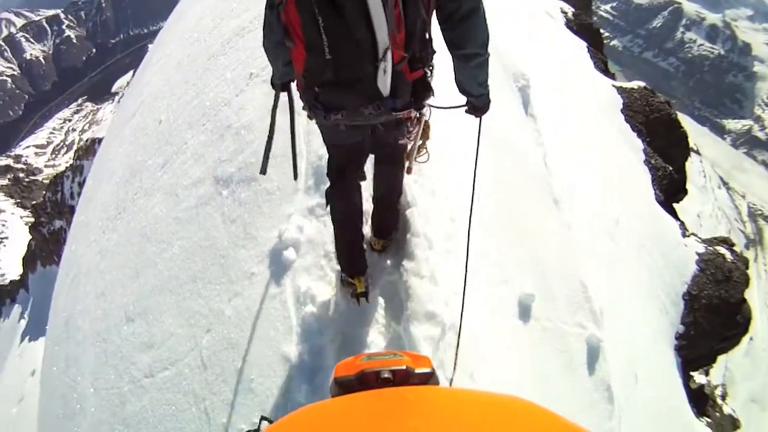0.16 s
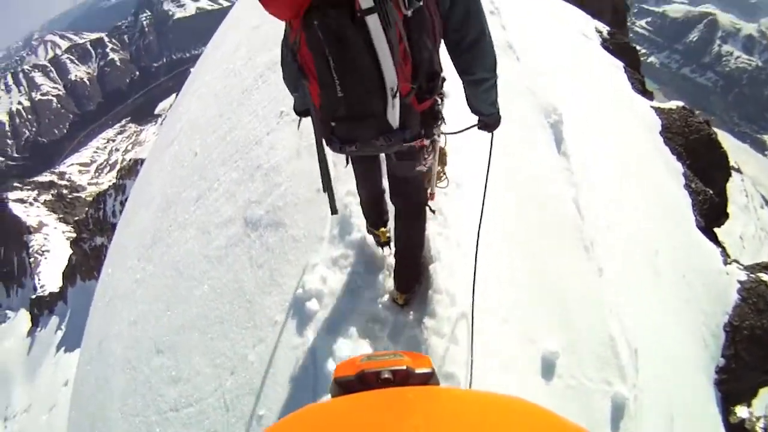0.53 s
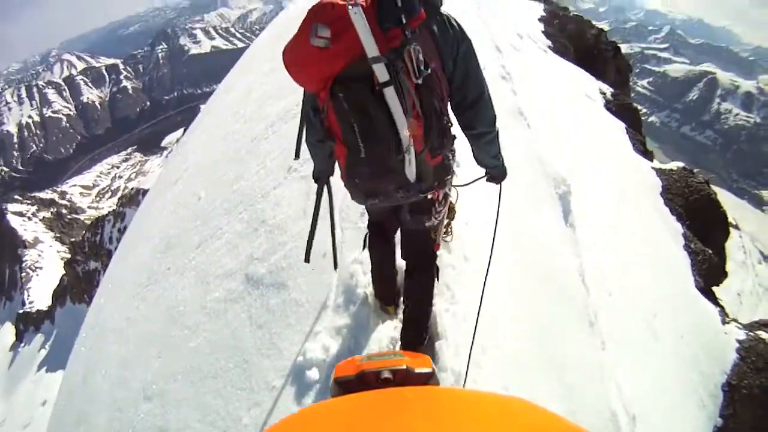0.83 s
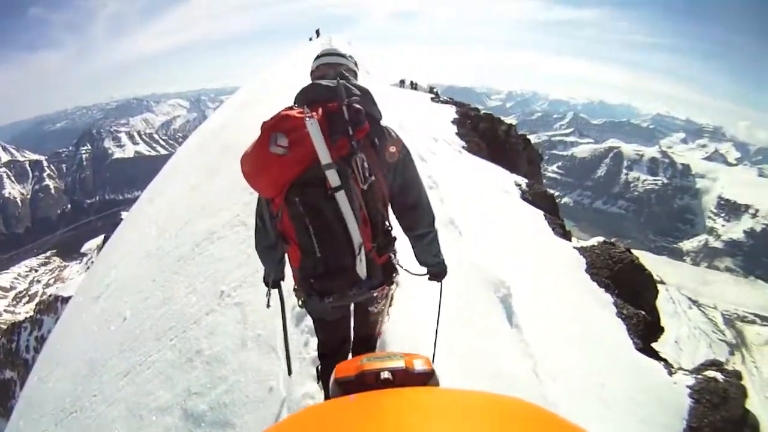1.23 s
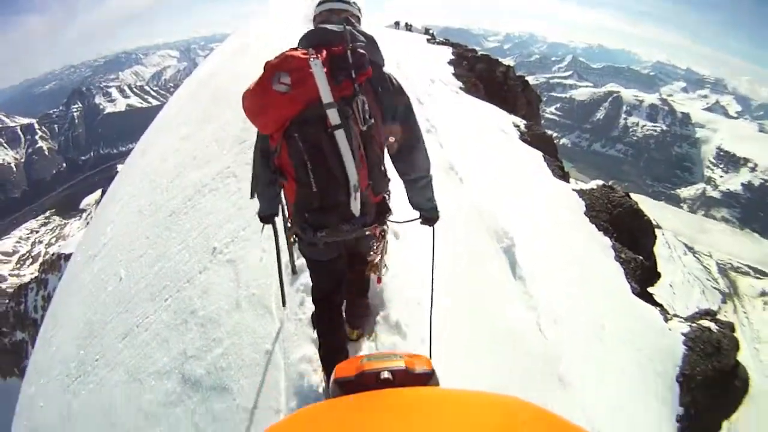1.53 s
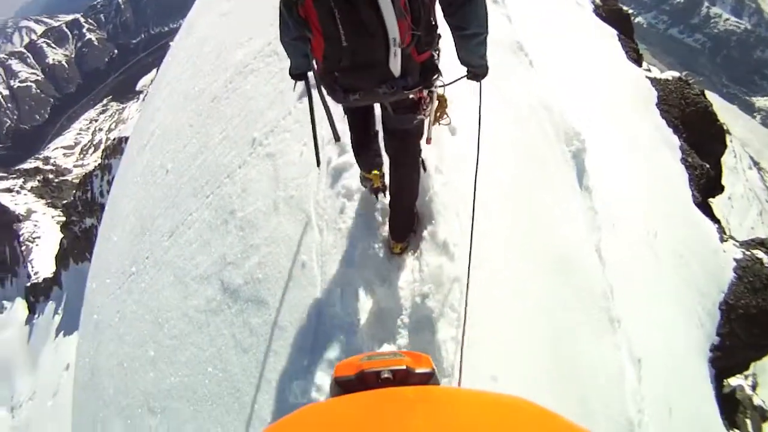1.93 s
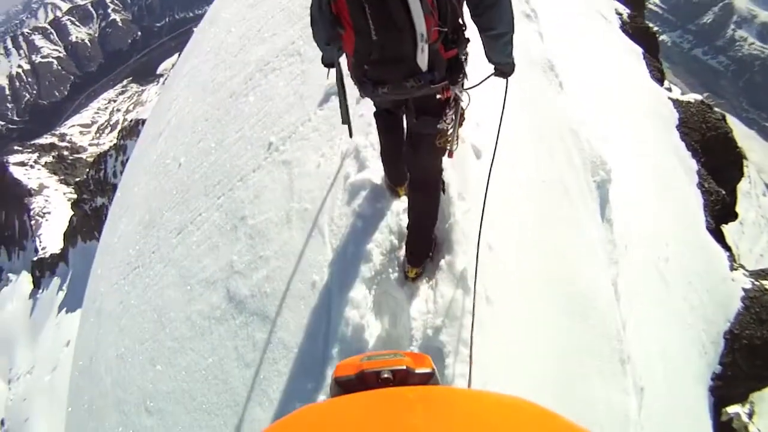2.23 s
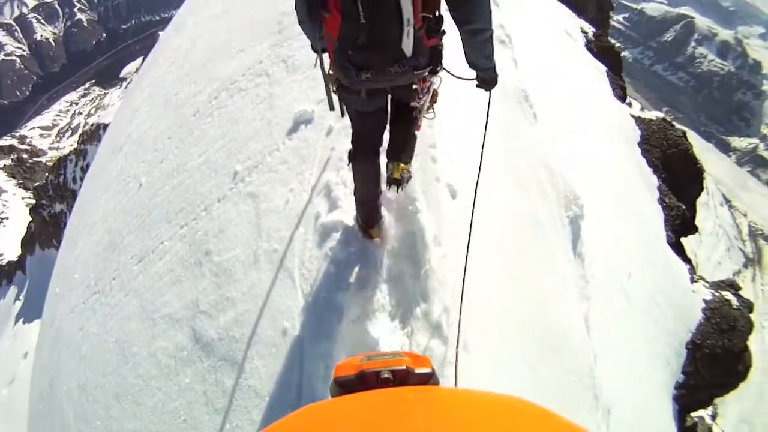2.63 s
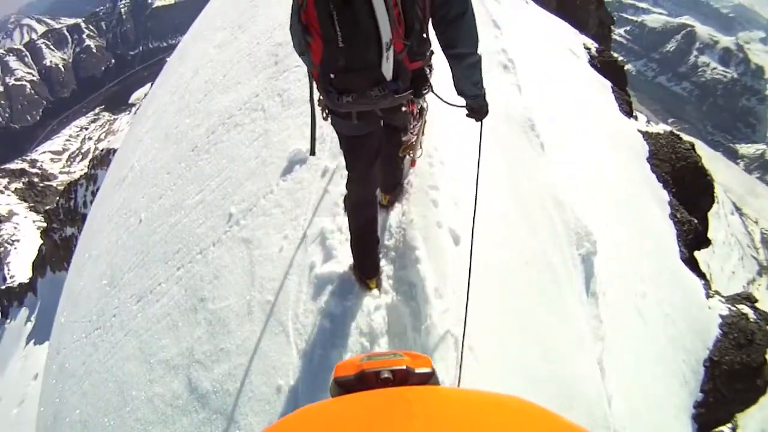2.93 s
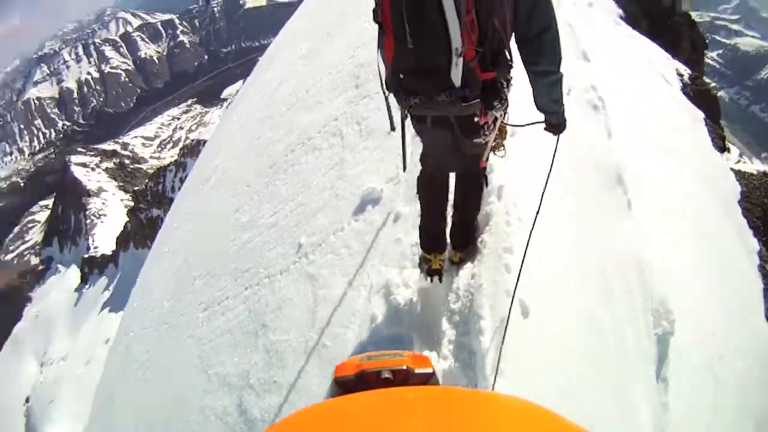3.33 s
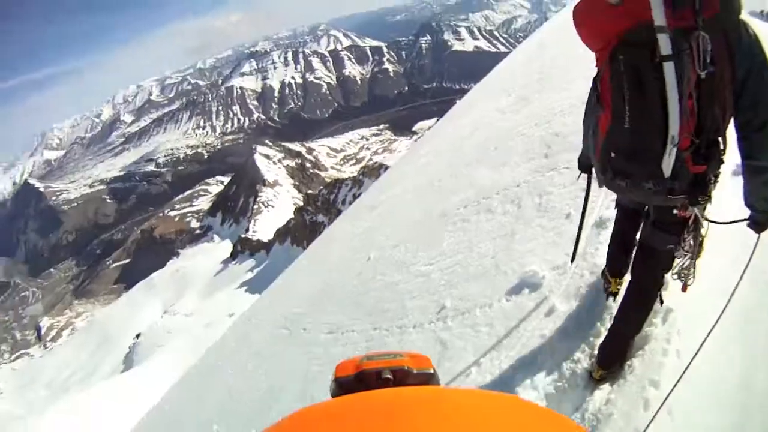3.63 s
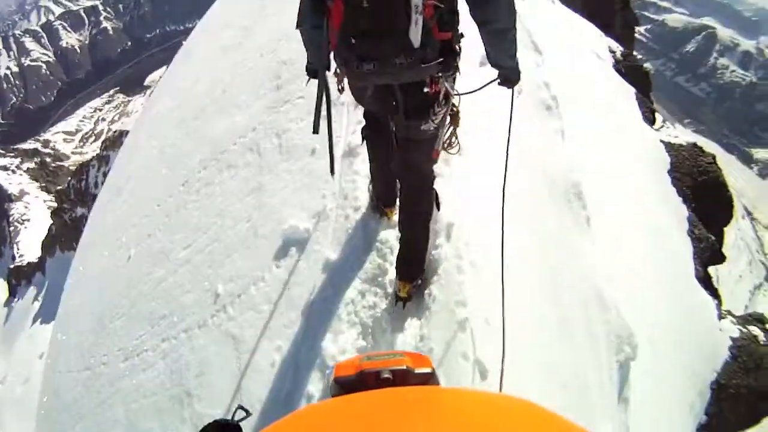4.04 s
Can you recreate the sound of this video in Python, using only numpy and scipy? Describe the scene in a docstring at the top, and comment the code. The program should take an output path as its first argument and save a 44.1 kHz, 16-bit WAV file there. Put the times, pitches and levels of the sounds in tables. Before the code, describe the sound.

Slow footfalls thud deeply through a helmet microphone, with sharp plastic ticks, faint snow crunch and a light wind rumble.

```python
"""A faint scuff and squeak of snow, then the deep shudder of slow footfalls: a climber in crampons on a snow
ridge, heard from a microphone shut in a camera case on the helmet, a body's height above the boots. Each step
shakes the mount, and some make the case tick. Crunching snow, squeaking spikes and brushing trousers come
faintly through the plastic, over light wind and the microphone's own hiss, while a coarse sample-and-hold
mirrors the sound faintly into the treble."""
import sys
import numpy as np
from scipy import signal
from scipy.fft import rfft, irfft
from scipy.io import wavfile

SR = 44100
rng = np.random.default_rng(int(sys.argv[2]) if len(sys.argv) > 2 else 0)


def store_wav(level_fs):
    """Save 16-bit WAV to argv[1]."""
    pcm = np.round(np.clip(np.atleast_2d(level_fs), -1, 1) * 32767)
    wavfile.write(sys.argv[1], SR, pcm.T.astype(np.int16))


N = 183985
TIME = np.arange(N) / SR

# footfalls, carried up to the helmet: t/s at the height, level/dB, f/Hz, rise/s, lopsidedness/0-1,
# rebound delay/s, rebound level/dB, settling delay/s, settling level/dB, packing snow level/dB
FOOTFALLS = [(0.239, -30.5, 34.8, 0.031, .02, 0.054, -36, 0.2, -39.5, -84),
             (0.964, -26, 33, 0.036, 0.07, 0.075, -32, 0.2, -51, -81),
             (1.72, -31, 30.6, 0.038, 0.11, 0.041, -32, 0.13, -38.5, -76),
             (2.35, -21, 31, 0.03, 0.21, .04, -42, 0.11, -39, -65.5),
             (2.946, -17.5, 33.3, 0.031, 0.05, 0.08, -27.5, 0.16, -31.5, -69.5),
             (3.749, -23.5, 32, 0.063, 0.11, 0.049, -27, .124, -51, -74.5)]
# ticks of the case and bright clinks of metal against it, right at the microphone: t/s, level/dB,
# brightness/(dB per octave)
CASE_TICKS = [(0.9471, -32.5, -3.5), (1.015, -49, 20), (1.1277, -21, -3), (1.3532, -51, -3),
              (2.121, -49, 5), (2.3087, -16.5, -0.5), (2.356, -42.5, -8), (2.926, -42, 19.5),
              (2.941, -39.5, -9), (2.959, -47, 20), (3.7218, -38.5, -12), (3.7225, -38, 20.5)]
# modes of the case: f/Hz, relative level/dB, base t60/s
CASE_MODES = [(693, -23.5, 0.088), (1172, 11.5, 0.019), (1660, 6, 0.024), (1815, -11, 0.043),
              (2225, 11, 0.013), (2700, -9, 0.021), (3507, -4, 0.018), (4670, -46, .014)]
# resonances of snow heard through the shell: f/Hz, width/Hz, relative level/dB
SHELL_BANDS = [(1209, 123, 4), (1797, 248, 2.5), (2170, 190, 0), (2563, 230, -7.5), (3534, 167, -5.5),
               (4570, 3400, -17)]
# a swinging boot scuffs the snow: t/s at the height, level/dB, half length/s
BOOT_SCUFFS = [(0.005, -59.5, 0.011), (0.189, -62.5, 0.0041), (0.892, -65, .018), (1.606, -66, 0.16),
               (2.006, -63.5, .009), (2.362, -55.5, 0.0094), (2.787, -62, 0.03), (3.443, -64.5, 0.041),
               (3.584, -49.5, 0.0092)]
# spikes squeak in packed snow: t/s at the height, level/dB, half length/s, f/Hz, glide/(octaves per s)
SPIKE_SQUEAKS = [(0.01, -68, 0.041, 1126, -0.71), (1.697, -62, 0.015, 1097, -0.76),
                 (3.458, -58.5, 0.0162, 1868, -0.83), (3.818, -67.5, 0.083, 1717, -.1)]
# trouser legs brush past each other: t/s at the height, level/dB, half length/s
TROUSER_SWISHES = [(0.45, -66, 0.031), (1.562, -62, 0.018), (1.683, -59, 0.031), (2.81, -61.5, 0.032),
                   (3.438, -62.5, 0.02)]
# spectrum of nylon sliding on nylon: f/Hz, relative level/dB
NYLON_SPECTRUM = [(100, -53), (700, -9), (1300, -8), (2800, 2.5), (4300, 0), (5600, 3)]
# spectrum of wind on the case: f/Hz, relative level/dB
WIND_SPECTRUM = [(10, -16.5), (22, -1.5), (38, -4), (50, -8), (70, -24), (110, -37.5), (250, -60),
                 (600, -61)]
# spectrum of the microphone's hiss: f/Hz, relative level/dB
HISS_SPECTRUM = [(60, 8), (130, 2.5), (240, 0), (330, -2.5), (600, -5.5), (1000, -8), (2000, -10.5),
                 (3000, -13), (4200, -14.5), (5600, -15)]

CONVERTER_HZ, ALIAS_EDGE_HZ, CUTOFF_HZ = 12000, 5620, 16000
LEAN_BEFORE_S, LEAN_DB, LEAN_HZ, LEAN_S = 0.125, -47.5, 28.7, 0.054   # weight shifts ahead of a step
JOLT_FADE_S, SETTLE_S = 0.035, 0.086
REBOUND_HZ, REBOUND_RISE_S, REBOUND_FADE_S = 39.44, 0.02, 0.031
TICK_EDGE_HZ, EDGE_GROWTH = 5700, 1.74   # top edge of a light contact; its rise with force
SOFT_RING_SCALE, RING_DAMPING = 1.34, 1.9   # a light contact rings longer; force damps it
THUD_CAP_DB, THUD_LOSS = -40, 0.44   # the padding limits the thud; bright, light contacts thud less
BITE_BEFORE_S, BITE_S = 0.06, 0.025   # the spikes enter just before the weight lands
BITE_DB, BITE_FOLLOWS = -50, 0.59   # level under a 0 dB footfall; dB gained per dB of footfall
PACK_AFTER_S, PACK_S, PACK_REST_DB = 0.16, 0.1, -71.5   # packing snow never quite rests


def helmet(rub_db=-26):
    """At each footfall the microphone's mount leans, jolts, swings back and settles, rubbing its pads."""
    swing, effort = np.zeros(N), np.zeros(N)
    for at, db, hz, rise_s, lopsided, rebound_s, rebound_db, settle_s, settle_db, _ in FOOTFALLS:
        phase = 2 * np.pi * hz * (TIME - at)
        lean = shudder(at - LEAN_BEFORE_S, LEAN_DB, LEAN_S, LEAN_S)
        jolt = shudder(at, db, rise_s, JOLT_FADE_S)
        back = shudder(at + rebound_s, rebound_db, REBOUND_RISE_S, REBOUND_FADE_S)
        back += shudder(at + settle_s, settle_db, SETTLE_S, SETTLE_S)
        swing += lean * np.cos(2 * np.pi * LEAN_HZ * (TIME - at + LEAN_BEFORE_S))
        swing += jolt * (np.cos(phase) + lopsided * np.cos(2 * phase))   # an uneven swing adds its octave
        swing += back * np.cos(2 * np.pi * REBOUND_HZ * (TIME - at - rebound_s))
        effort += lean ** 2 + jolt ** 2 + back ** 2
    padding = noise([(30, -29), (60, 1.5), (85, -5), (150, -16.5), (230, -25.5), (400, -31),
                     (1000, -37), (3000, -48)])
    return swing + from_db(rub_db) * np.sqrt(effort + 1e-12) * padding


def case_ticks(low_cut_hz=600, grit_db=-28, grit_growth=18, grit_t60=0.018, thud_hz=205, thud_t60=0.029):
    """Contacts ring the case around the microphone and thud its mount; hard ones die sooner."""
    hz, mode_db, t60 = np.transpose(CASE_MODES)[:, :, None]
    signs = (-1) ** np.arange(len(CASE_MODES))[:, None]   # adjacent modes push the microphone oppositely
    age, out = np.arange(SR // 10) / SR, np.zeros(N + SR)
    thud = decay(age, thud_t60) * np.sin(2 * np.pi * thud_hz * age)
    thud = signal.sosfilt(signal.butter(2, 2 * thud_hz, fs=SR, output="sos"), thud)
    for at, db, tilt_db in CASE_TICKS:
        force = from_db(db)
        strength = signs * from_db(mode_db + tilt_db * np.log2(hz / hz[1]))
        ring_s = t60 * SOFT_RING_SCALE / (1 + RING_DAMPING * force)
        modes = decay(age, ring_s) * np.sin(2 * np.pi * hz * age)
        ring = (strength * modes).sum(0) / np.linalg.norm(strength)
        slip = from_db(grit_db) * (1 + grit_growth * force)   # the faces slip, more so in a hard knock
        grit = slip * decay(age, grit_t60) * rng.standard_normal(len(age))
        edge_hz = min(TICK_EDGE_HZ * (1 + EDGE_GROWTH * force), CUTOFF_HZ)
        contact = signal.butter(3, [low_cut_hz, edge_hz], "band", fs=SR, output="sos")
        tick = signal.sosfilt(contact, ring + grit)
        thud_db = min(db, THUD_CAP_DB) - THUD_LOSS * max(tilt_db, 0)
        start = int(at * SR)
        out[start:start + len(age)] += force * tick + from_db(thud_db) * thud
    return out[:N]


def snow():
    """Down at the boots, spikes bite coarsely, snow packs finely under the weight, and soles scuff."""
    packing = sum(from_db(db) * swell(at + PACK_AFTER_S, PACK_S) for at, *_, db in FOOTFALLS)
    biting = sum(from_db(BITE_DB + BITE_FOLLOWS * db) * swell(at - BITE_BEFORE_S, BITE_S)
                 for at, db, *_ in FOOTFALLS)
    scuffing = sum(from_db(db) * swell(at, half_s) for at, db, half_s in BOOT_SCUFFS)
    fine = crunch(grains_per_s=5000, spread_db=4.0)
    coarse = crunch(grains_per_s=2500, spread_db=3.5)
    return (from_db(PACK_REST_DB) + packing) * fine + (biting + scuffing) * coarse


def crunch(grains_per_s, spread_db):
    """Snow crystals break at random, and the shell colours their clicks on the way in; rms 1."""
    sizes = from_db(spread_db * np.minimum(rng.exponential(1, N), 4))
    signs = rng.choice([-1, 1], N)
    clicks = sizes * signs * (rng.random(N) < grains_per_s / SR)
    return rms_one(sum((-1) ** k * from_db(db) * resonate(clicks, hz, width)
                       for k, (hz, width, db) in enumerate(SHELL_BANDS)))


def squeaks(waver=0.0188, rough_db=4.5):
    """Steel sticks and slips in the snow underfoot: an unsteady tone that sinks as the foot slows."""
    out = np.zeros(N)
    for at, db, half_s, hz, glide in SPIKE_SQUEAKS:
        octaves = glide * np.clip(TIME - at, -2 * half_s, 2 * half_s)
        pitch = hz * 2 ** octaves * (1 + waver * drift(96))
        tone = np.sin(2 * np.pi * np.cumsum(pitch) / SR) * from_db(rough_db * drift(42))
        out += from_db(db) * swell(at, half_s) * rms_one(tone)
    return out


def trousers(flutter_db=6.5):
    """Well below the microphone, nylon slides on nylon in mid-stride with a bright, uneven swish."""
    sliding = sum(from_db(db) * swell(at, half_s) for at, db, half_s in TROUSER_SWISHES)
    flutter = from_db(flutter_db * np.tanh(drift(100)))
    return sliding * flutter * noise(NYLON_SPECTRUM)


def wind(level_db=-52, gust_db=1.0):
    """Light wind over the ridge rumbles directly on the case."""
    return from_db(level_db + gust_db * drift(0.81)) * noise(WIND_SPECTRUM)


def hiss(level_db=-60):
    """The microphone's own even noise floor."""
    return from_db(level_db) * noise(HISS_SPECTRUM)


def shudder(at, db, rise_s, fade_s):
    """The envelope of a swing that grows to its height and fades."""
    return from_db(db) * swell(at, np.where(TIME < at, rise_s, fade_s) / np.sqrt(2))


def swell(at, half_s):
    """A bell-shaped rise and fall of height 1."""
    return np.exp(-0.5 * np.minimum(((TIME - at) / half_s) ** 2, 100))


def decay(age, t60):
    """A fade that loses 60 dB in t60 seconds."""
    return np.exp(-np.log(1000) * age / t60)


def resonate(x, hz, width_hz):
    """A resonance with gain 1 at its peak."""
    r = np.exp(-np.pi * width_hz / SR)
    feedback = [1, -2 * r * np.cos(2 * np.pi * hz / SR), r * r]
    return signal.lfilter(np.array([1, 0, -1]) * (1 - r * r) / 2, feedback, x + 1e-18)


def noise(spectrum):
    """Steady noise of rms 1, coloured by rows of f/Hz, relative level/dB."""
    hz, db = np.transpose(spectrum)
    bins = np.maximum(np.arange(N // 2 + 1) * SR / N, 1)
    colour = from_db(np.interp(np.log(bins), np.log(hz), db))
    return rms_one(irfft(rfft(rng.standard_normal(N)) * colour, N))


def drift(rate_hz):
    """A random wander of rms 1, mostly slower than rate_hz."""
    bins = np.arange(N // 2 + 1) * SR / N
    return rms_one(irfft(rfft(rng.standard_normal(N)) / (1 + (bins / rate_hz) ** 2), N))


def low_pass(x, edge_hz, taps):
    """A steep low-pass that keeps the timing."""
    return signal.fftconvolve(x, signal.firwin(taps, edge_hz, fs=SR), "same")


def from_db(db):
    """Decibels to gain."""
    return 10 ** (np.asarray(db) / 20)


def rms_one(x):
    """Scale to unit power."""
    return x / np.sqrt(np.mean(x ** 2) + 1e-20)


def scene():
    """Everything reaches the one microphone inside the case; the open ridge gives no echo."""
    return (helmet() + case_ticks() + snow() + squeaks() + trousers() + wind() + hiss())[None]


def record(dry):
    """A slow converter holds each sample four times, which mirrors the sound faintly into the treble."""
    smooth = low_pass(dry[0], ALIAS_EDGE_HZ, taps=81)
    slow = signal.resample_poly(smooth, 4 * CONVERTER_HZ, SR)[::4]
    held = signal.resample_poly(np.repeat(slow, 4), SR, 4 * CONVERTER_HZ)[:N]
    return low_pass(held, CUTOFF_HZ, taps=201)[None]


dry = scene()
out = record(dry)
store_wav(out)
```